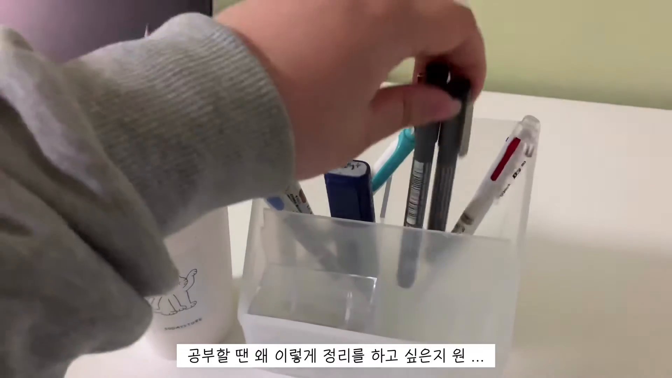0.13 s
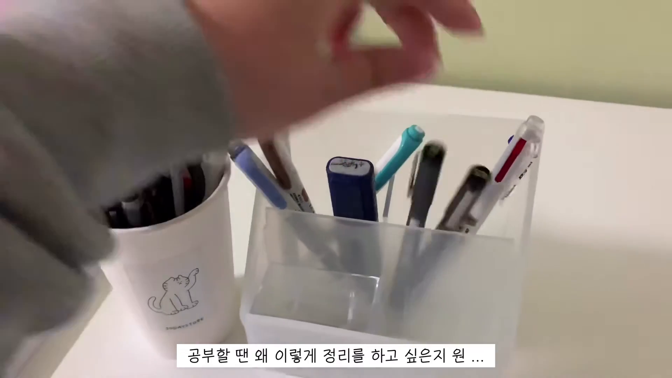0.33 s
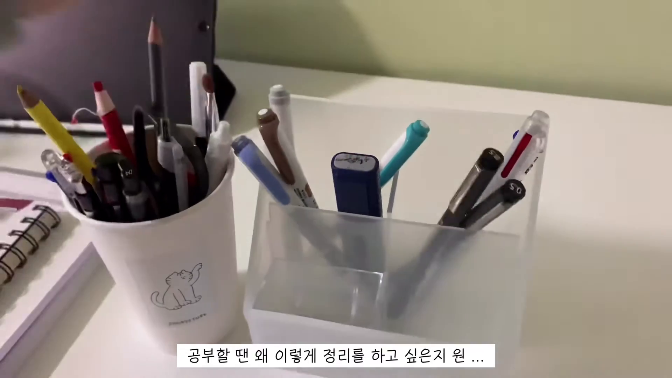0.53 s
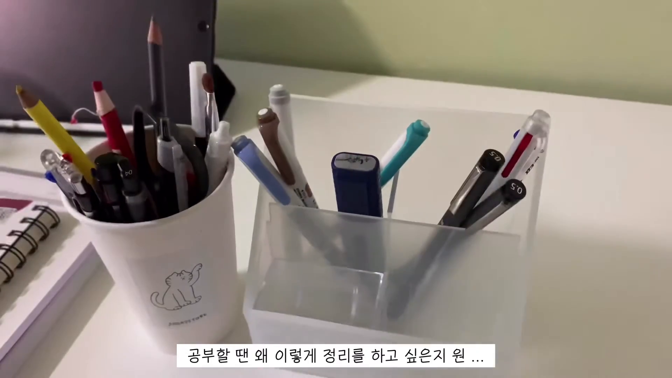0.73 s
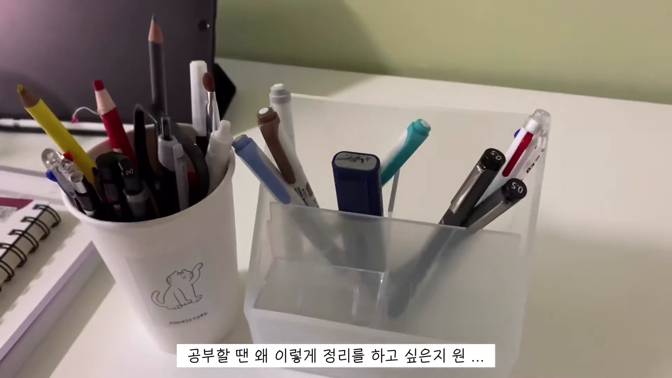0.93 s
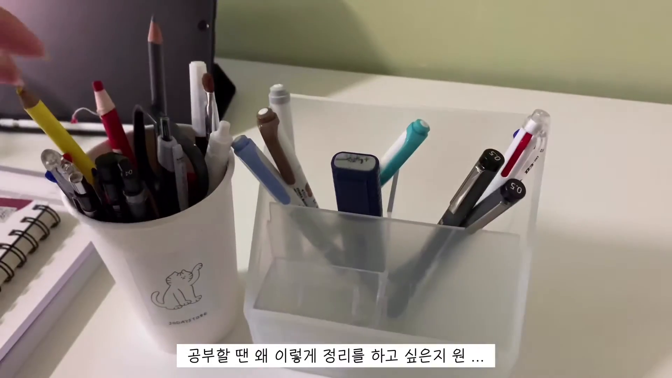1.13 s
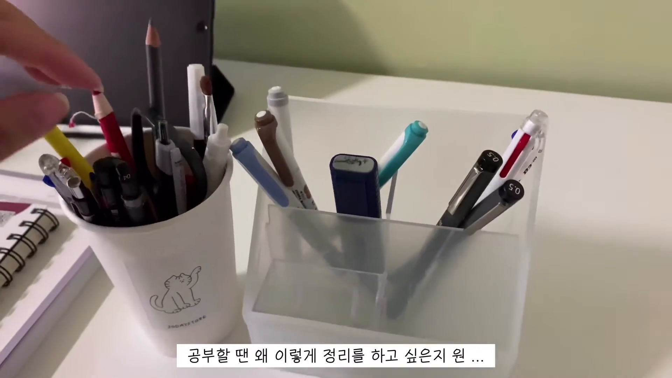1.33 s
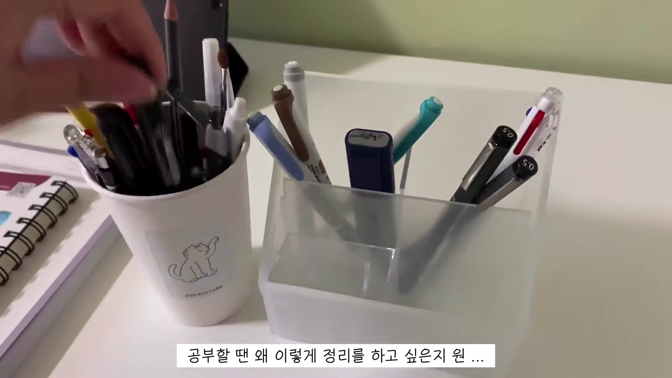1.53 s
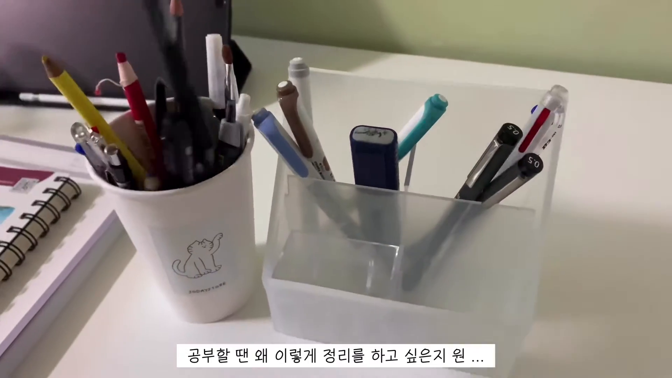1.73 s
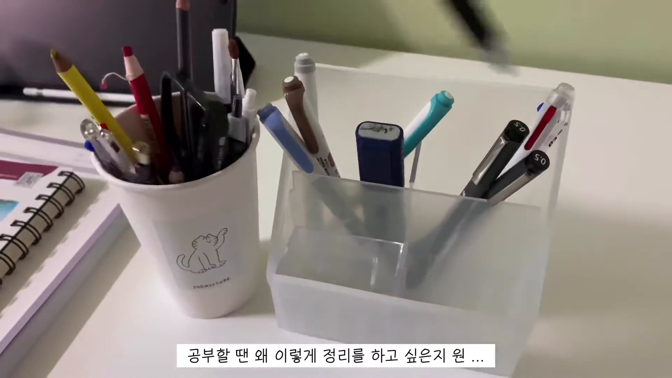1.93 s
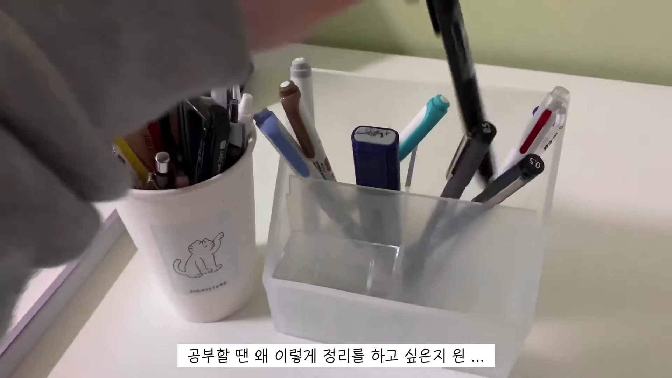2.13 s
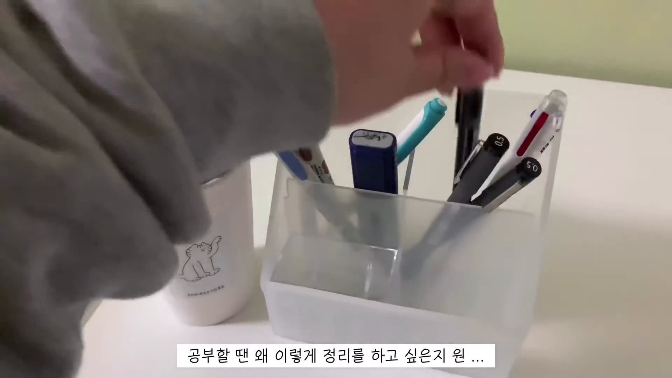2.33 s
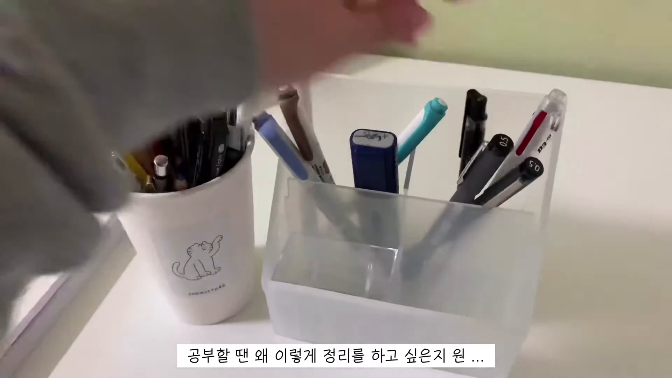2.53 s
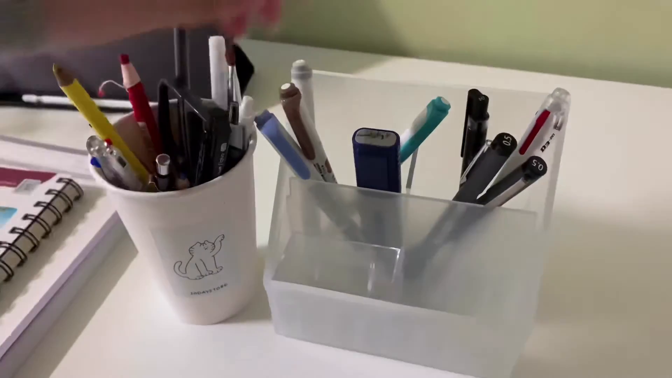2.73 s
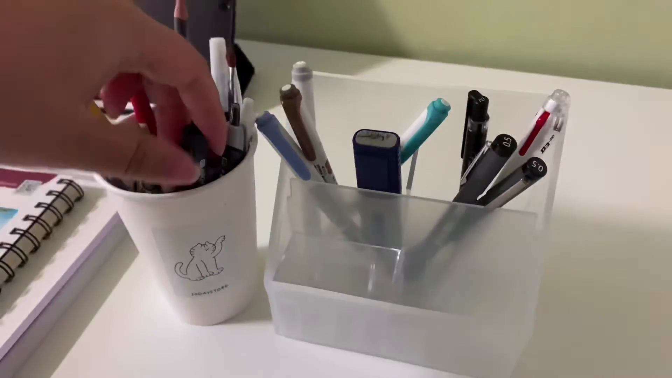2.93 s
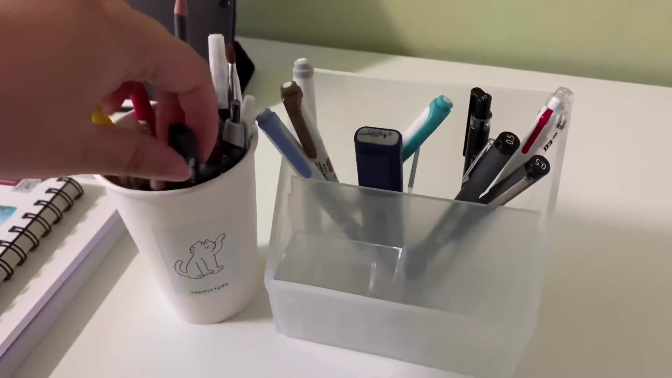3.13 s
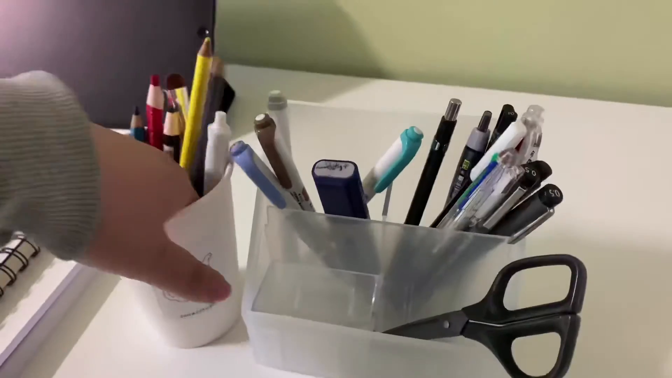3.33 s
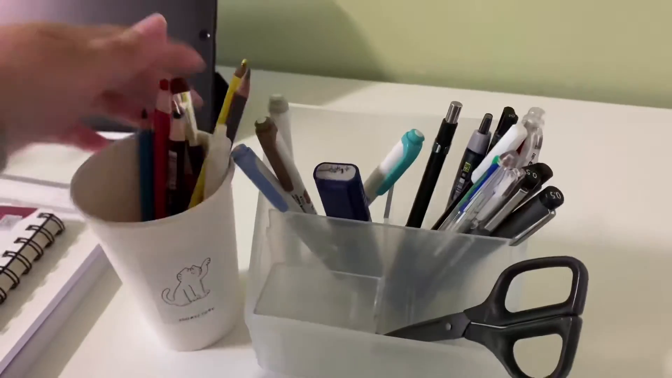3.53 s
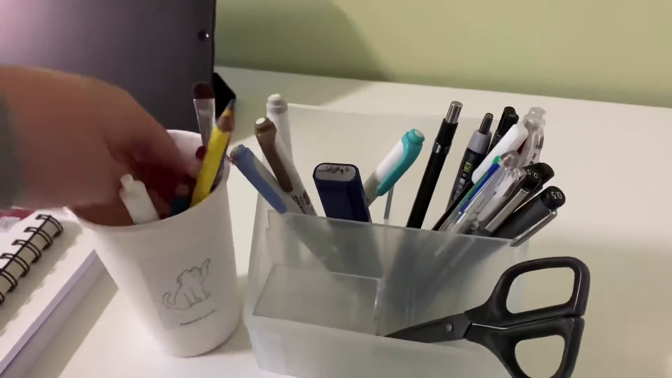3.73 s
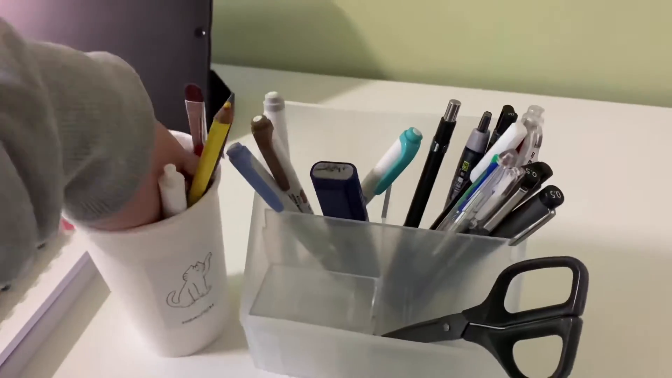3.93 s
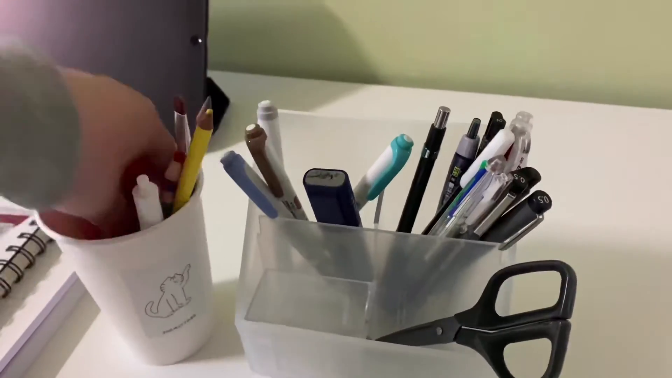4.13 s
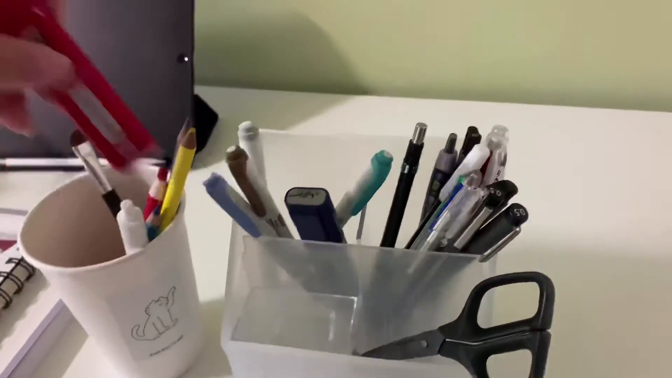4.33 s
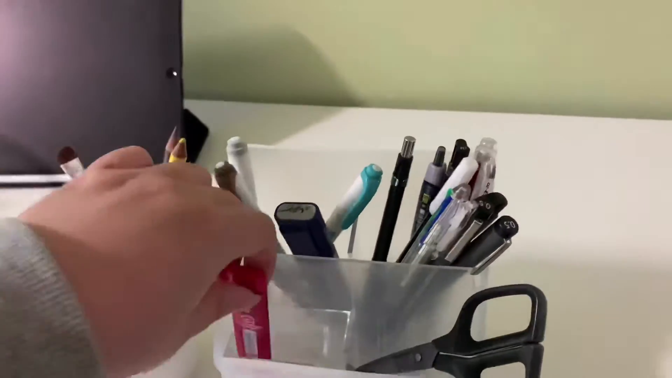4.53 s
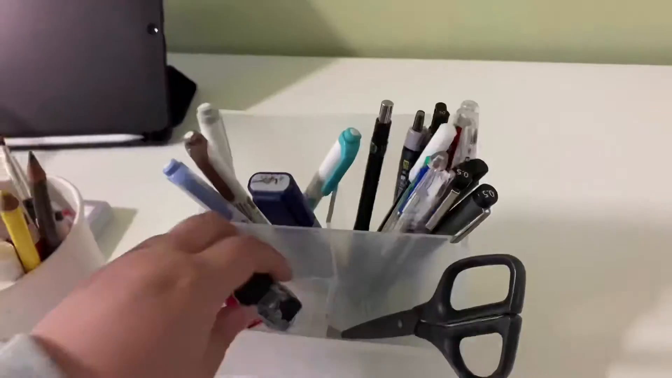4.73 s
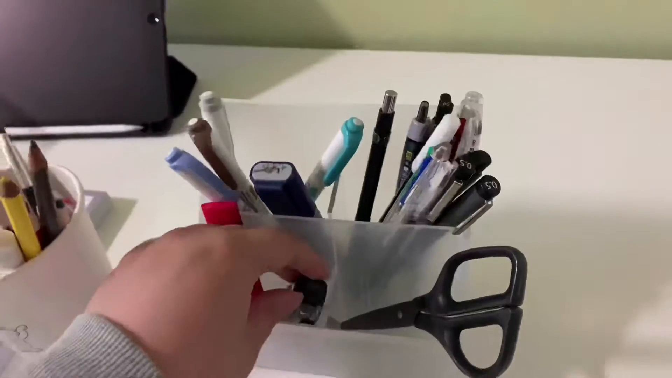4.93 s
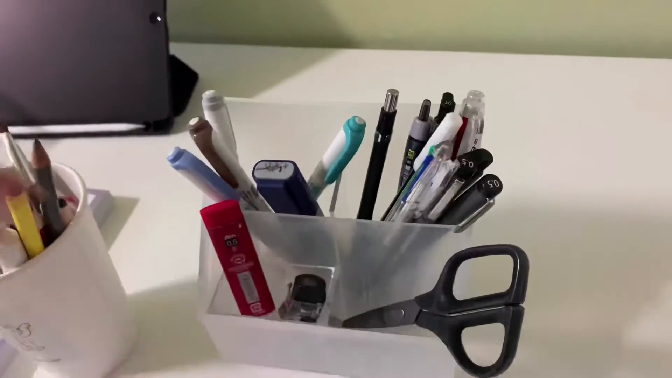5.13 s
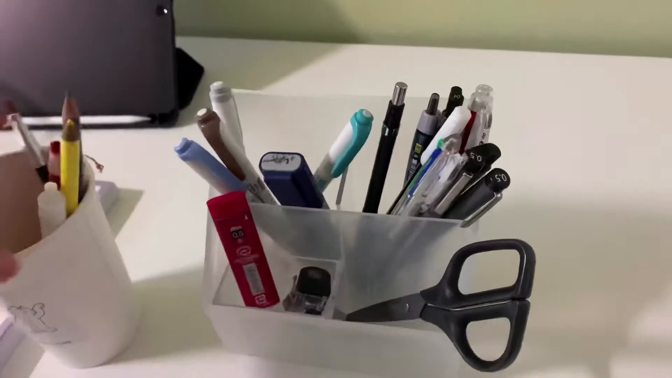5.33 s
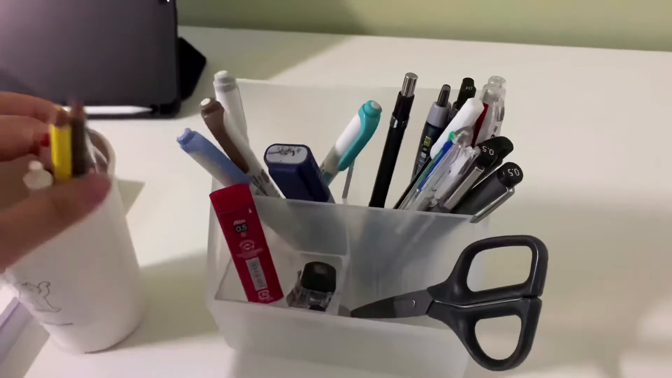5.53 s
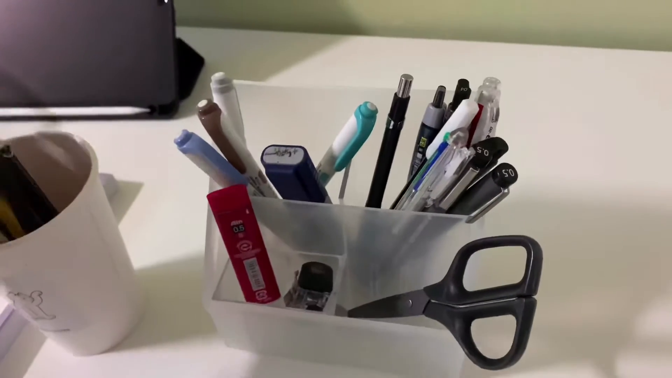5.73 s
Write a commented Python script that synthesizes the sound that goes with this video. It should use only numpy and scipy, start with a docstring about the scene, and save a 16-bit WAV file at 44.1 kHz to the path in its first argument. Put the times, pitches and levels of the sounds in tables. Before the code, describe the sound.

Close up in a small quiet room, two bursts of clatter sound as pens fall into a hollow plastic desk holder, with soft tapping and scraping between them. Lighter, busier sounds follow: pencils jostle in a paper cup and little items click into the now fuller holder. At the end the cup scrapes softly across the desk and the pencils rattle inside.

```python
"""Pens, paper cup and desk organizer.

Pens pulled from a paper cup drop into a nearly empty plastic organizer, which rings and thumps the desk.
Then fingers rummage among the pencils in the cup, small plastic items click into the filled organizer,
and the cup slides over the desk, pencils rattling. Close stereo microphone, small quiet room."""
import sys
import numpy as np
from scipy import signal
from scipy.fft import rfft, irfft, next_fast_len
from scipy.io import wavfile
from scipy.ndimage import uniform_filter1d

SR = 44100
rng = np.random.default_rng(int(sys.argv[2]) if len(sys.argv) > 2 else 0)


def transcribe(u):
    """Save the signal u as a 16-bit wav file named by the first command-line argument.

    u: samples, shape (n,) or (channels, n), limited to [-1, 1]; the rate is SR.
    q: integer samples, one column per channel.
    """
    v = np.clip(np.atleast_2d(u).T, -1, 1)
    q = np.round(v * 32767).astype(np.int16)
    wavfile.write(sys.argv[1], SR, q)


N = 259308

# Struck parts. Each pair: ring pitch in Hz, ring level in dB re the crack.
PENCIL, BARREL, MARKER = (1380, 4), (1880, 0), (1665, 1)
CAP, LID, CLIP, NIB = (2480, 5), (3100, 6.5), (4700, 2), (8600, 6)
GRIPPED = (5600, -12.5)  # damped by the fingers
# Modes. Each row: frequency in Hz, relative level in dB, T60 in seconds.
HOLLOW_WALL_MODES = [(306.6, -10, 0.026), (388.2, -7.5, 0.34), (440, -3.5, 0.096), (516, 8, 0.065),
                     (632, -4.5, 0.097), (765.6, -9, .12), (880, -8, 0.014), (873, -4.5, 0.15),
                     (953, -0.5, .09), (1167, -10.5, 0.17), (1474, -11.5, 0.071), (1644, 1, 0.13),
                     (1855, -1.5, 0.13), (1995, -8, .08), (2227, -5, 0.022), (2370, -5, 0.15),
                     (3119, -12, 0.058), (5030, -8, 0.066)]  # nearly empty organizer
CUP_WALL_MODES = [(294.6, 7, 0.089), (379.7, -4.5, 0.092), (570, -13.5, 0.048), (749.6, 4.5, 0.028),
                  (862, 9.5, 0.012), (1012, 0, 0.045), (1272, 8.5, 0.036), (1464.4, 9, 0.057),
                  (1658, -7, 0.048), (2091, -0.5, 0.055), (2300, -24, 0.058), (2650, -6, 0.02),
                  (2980, -26, 0.054)]  # cup beside the filled organizer
DESK_HEAVY_MODES = [(57.55, -13, 0.35), (100, -2.5, 0.14), (124.3, -1, 0.13), (150.7, 0.5, 0.13),
                    (183, -5, 0.073)]  # under pens
DESK_LIGHT_MODES = [(136, -31, 0.18), (148.7, -1.5, 0.094), (166.8, -4.5, 0.075), (227, -5.5, 0.049)]  # under light items


def amp(db):
    """Decibels to gain."""
    return 10 ** (np.asarray(db) / 20)


def unit(x):
    """Scale to unit RMS."""
    return x / np.sqrt(np.mean(x ** 2) + 1e-30)


def interp_log(points, hz):
    """Interpolate (Hz, value) points over log frequency."""
    points_hz, values = np.transpose(points)
    return np.interp(np.log(hz + 1), np.log(points_hz + 1), values)


def colour(x, points):
    """Filter by (Hz, dB) points."""
    n = x.shape[-1]
    size = next_fast_len(n + 2048)
    gain = amp(interp_log(points, np.fft.rfftfreq(size, 1 / SR)))
    return irfft(rfft(x, size) * gain, size)[..., :n]


def low_cut(x, hz):
    """Third-order high-pass."""
    return signal.sosfilt(signal.butter(3, hz, "high", fs=SR, output="sos"), x)


def add(mix, start_s, sound):
    """Mix a stereo sound in place."""
    part = mix[:, max(round(start_s * SR), 0):][:, :sound.shape[1]]
    part += sound[:, :part.shape[1]]


def stereo(pair):
    """Mid and side to left and right: bass shared, treble wide."""
    # Each row: frequency in Hz, side gain in dB.
    width = [(60, -16.5), (140, -18.5), (260, -15), (1000, -2), (2000, -3.5), (4000, 0.5), (8000, 1.5),
             (13000, -1)]
    # Each row: frequency in Hz, left re right in dB.
    balance = [(150, -0.5), (270, -2), (420, 2.5), (700, -0.5), (1050, 4), (1500, -1), (2000, 2), (3000, 0),
               (12000, -1.5)]
    side = colour(pair[1], width)
    half = np.array(balance) * [1, .5]
    return np.array([colour(pair[0] + side, half), colour(pair[0] - side, half * [1, -1])])


def ring(modes, t, scatter_db, rise_s):
    """Damped modes; each contact point weights them differently."""
    hz, db, t60_s = np.transpose(modes)[:, :, None]
    gain = amp(db + scatter_db * rng.standard_normal(db.shape))
    decay = np.exp(-np.log(1000) * t / t60_s)
    tones = np.sin(2 * np.pi * (hz * t + rng.random(db.shape)))
    return (gain * decay * tones).sum(0) * (1 - np.exp(-t / rise_s))


def quiet_room():
    """Faint hum and moving air, each steady for a stretch."""
    # Each row: start in seconds, hum level in dB, air level in dB.
    stretches = [(0, -116, -104), (.1, -70, -93), (3.22, -88, -70.5), (5.16, -100, -64.5)]
    # Each row: frequency in Hz, relative density in dB.
    hum_spectrum = [(20, -18), (45, -6.5), (60, -1), (85, -10.5), (118, -1), (160, -16), (300, -24.5),
                    (900, -32), (2000, -37.5), (16000, -44)]
    air_spectrum = [(20, -37.5), (90, -20), (160, -2), (230, -11), (305, 6.5), (420, -9.5), (700, -20.5),
                    (3000, -30), (12000, -32.5), (16000, -40)]
    start_s, hum_db, air_db = np.transpose(stretches)
    stretch = np.searchsorted(start_s[1:], np.arange(N) / SR)
    out = np.zeros((2, N))
    for db, spectrum in [(hum_db, hum_spectrum), (air_db, air_spectrum)]:
        gain = amp(uniform_filter1d(db[stretch], round(.025 * SR)))
        out += gain * unit(stereo(colour(rng.standard_normal((2, N)), spectrum)))
    return out


def room_tail(t):
    """Diffuse reflections, each band decaying at its own rate."""
    # Each row: frequency in Hz, T60 in seconds.
    decay_times = [(100, 0.46), (300, 0.24), (900, 0.19), (2500, 0.18), (7000, 0.1), (15000, 0.14)]
    # Each row: frequency in Hz, gain in dB.
    tail_spectrum = [(150, -3), (500, 4), (1200, 2), (3000, 1), (6000, 0), (13000, -6)]
    hz, frame_s, noise = signal.stft(rng.standard_normal((2, len(t))), SR, nperseg=256)
    decay = amp(-60 * frame_s / interp_log(decay_times, hz)[:, None])
    tail = signal.istft(noise * decay, SR, nperseg=256)[1][:, :len(t)]
    return colour(tail * (1 - np.exp(-t / .005)) / np.linalg.norm(tail[0]), tail_spectrum)


def slips(per_s, size_db, decay_s):
    """Stick-slip envelope: short pushes, random in size and time."""
    sizes = amp(size_db * np.minimum(rng.exponential(1, N), 3)) * (rng.random(N) < per_s / SR)
    return unit(signal.lfilter([1], [1, -np.exp(-1 / (decay_s * SR))], sizes))


def jostle(per_s=250, low_hz=750, high_hz=8000, tilt_db_per_oct=-1, count=24):
    """Pencils tap each other, each at its own dull pitch."""
    t, out = np.arange(1024) / SR, np.zeros((2, N))
    sizes = np.minimum(rng.exponential(1, N), 3) * (rng.random(N) < per_s / SR)
    pencil = rng.integers(0, count, N)
    hz = np.geomspace(low_hz, high_hz, count)[:, None, None]
    cycles = hz * t
    taps = np.sin(2 * np.pi * (cycles + rng.random((count, 2, 1)))) * cycles * np.exp(-cycles)
    taps *= amp(tilt_db_per_oct * np.log2(hz / low_hz))
    for at in np.flatnonzero(sizes):
        add(out, at / SR, sizes[at] * taps[pencil[at]])
    return unit(out)


def hand_pressure(strokes, grip_s=.011, release_s=.04, lurch_db=1, lurch_s=.02):
    """Uneven rubbing force and desk shake: each stroke grips, swells or sags, lets go."""
    now, force, shake = np.arange(N) / SR, np.zeros(N), np.zeros(N)
    for start_s, length_s, db, swell_db, rumble_db in strokes:
        t = now - start_s
        along = np.clip(t / length_s, 0, 1) - .5
        touching = np.clip(np.minimum(t / grip_s, 1 + (length_s - t) / release_s), 0, 1) ** 2
        push = touching * amp(db + swell_db * along)
        force = np.maximum(force, push)
        shake = np.maximum(shake, push * amp(rumble_db))
    lurch = unit(uniform_filter1d(rng.standard_normal(N), round(lurch_s * SR)))
    return force * amp(lurch_db * lurch), shake


def rubbing(strokes, wall_modes, desk_modes, spectrum, grains_per_s, catches_per_s,
            hiss_db, wall_db, taps_db, room_db, gain_db, rumble_db, cut_hz):
    """Friction: grains hiss, pencils jostle, rarer catches ring the walls, the hand shakes the desk."""
    t = np.arange(16384) / SR
    force, shake = hand_pressure(strokes)
    grains = rng.standard_normal((2, N)) * (slips(grains_per_s, size_db=3, decay_s=.00091) + amp(hiss_db))
    taps = jostle()
    catches = force * rng.standard_normal((2, N)) * slips(catches_per_s, size_db=6, decay_s=.0009)
    wall = np.array([ring(wall_modes, t, scatter_db=1, rise_s=.002) for _ in range(2)])
    hollow = signal.oaconvolve(catches, wall / np.linalg.norm(wall[0]), axes=1)[:, :N]
    scrape = force * (unit(colour(grains, spectrum)) + amp(taps_db) * taps)
    rub = amp(gain_db) * stereo(scrape + amp(wall_db) * hollow)
    rub += amp(room_db) * signal.oaconvolve(rub, room_tail(t), axes=1)[:, :N]
    desk = ring(desk_modes, t, scatter_db=1, rise_s=.0053)
    rumble = signal.oaconvolve(grains, desk[None], axes=1)[:, :N]
    return low_cut(rub + amp(rumble_db) * shake * unit(stereo(rumble)), cut_hz)


def cup_rubs():
    """Fingers rummage in the cup; the cup slides over the desk."""
    # Each row: start in seconds, length in seconds, relative level in dB, swell in dB, rumble offset in dB.
    strokes = [(3.218, 0.12, -51.5, -26.5, -8.5), (3.313, 0.061, -45, -17.5, -10),
               (3.528, 0.087, -42, -1, -6.5), (3.59, 0.057, -34.5, 0.5, -0.5), (3.69, 0.057, -46.5, 0, -13),
               (3.745, 0.058, -42, -10, -11), (3.82, .13, -54, 1, -12), (3.95, .16, -51.5, -4.5, -11.5),
               (4.115, 0.09, -51, -5, -13), (4.37, 0.042, -47, -21, -6.5), (4.595, 0.057, -45.5, 13, -27),
               (4.84, 0.063, -62.5, -20, -8), (4.95, .04, -67, -16, -14), (5.235, 0.035, -42, -15, 3),
               (5.279, 0.032, -36.5, -24.5, 1.5), (5.382, 0.17, -49.5, -2, -2.5),
               (5.548, 0.088, -51.5, 4, 4.5), (5.652, .06, -45, -22, -6.5), (5.725, 0.095, -46.5, 20, -17),
               (5.851, .03, -28.5, -3, -4)]
    # Each row: frequency in Hz, relative density in dB.
    spectrum = [(120, -12.5), (370, 0), (560, -15.5), (850, -11), (1450, -7), (1800, -17.5), (2550, -5.5),
                (3200, -14), (5900, -13.5), (7600, -24.5), (10000, -13), (13300, -24), (16000, -20)]
    return rubbing(strokes, CUP_WALL_MODES, DESK_LIGHT_MODES, spectrum,
                   grains_per_s=390, catches_per_s=90, hiss_db=-1, wall_db=-1.5, taps_db=-9,
                   room_db=-28.5, gain_db=-4, rumble_db=-2, cut_hz=135)


def slides_and_swells():
    """Pens slide and scrape; brief swells of noise lead into three loud clacks."""
    # Each row: start in seconds, length in seconds, relative level in dB, swell in dB, rumble offset in dB.
    strokes = [(.2, .025, -56.5, 6, 11), (.228, .014, -34.5, 13.5, 0), (1.45, 0.096, -46.5, -4, 10),
               (1.56, 0.13, -56.5, -3, 11), (1.67, 0.13, -64, -8, 12), (1.775, 0.13, -62.5, -3.5, 14),
               (1.905, 0.09, -47, 0, -1.5), (2.14, 0.096, -54, -22.5, -6), (2.26, 0.063, -68.5, 2, 20.5),
               (2.315, 0.012, -55.5, 15, 3), (2.36, 0.028, -41, 8, -1.5), (2.79, 0.12, -56, 2, 6.5),
               (3.03, .12, -66.5, -10.5, 11), (3.16, 0.062, -55.5, -14, -6)]
    # Each row: frequency in Hz, relative density in dB.
    spectrum = [(120, -4), (300, 13), (600, 7), (1000, -1), (1500, -4), (2300, 0), (3000, -10.5), (4000, 4),
                (5500, -11), (8000, -15), (10500, -29), (12500, -37), (16000, -42)]
    return rubbing(strokes, HOLLOW_WALL_MODES, DESK_HEAVY_MODES, spectrum,
                   grains_per_s=820, catches_per_s=150, hiss_db=-4, wall_db=-11.5, taps_db=-6,
                   room_db=-6.5, gain_db=-3.5, rumble_db=-4, cut_hz=38)


def crack(t, rise_s, snap_s, chatter_s, chatter_db, spread_s):
    """Hard snap and brief chatter; bending waves carry the treble out first."""
    decay = np.exp(-t / snap_s) + amp(chatter_db) * np.exp(-t / chatter_s)
    burst = rng.standard_normal((2, len(t))) * decay * (1 - np.exp(-(t / rise_s) ** 2))
    hz = np.fft.rfftfreq(len(t), 1 / SR)
    delay_s = spread_s * np.sqrt(1000 / (hz + 200))
    dispersion = np.exp(-2j * np.pi * np.cumsum(delay_s) * hz[1])
    return irfft(rfft(burst) * dispersion, len(t))


def barrel_ring(hz, t60_s, t):
    """Barrel, cap or clip: a cluster of close, short modes."""
    # Each row: frequency ratio, level in dB.
    cluster = [(.62, -7), (.74, -7), (.85, -4), (.94, -1), (1, 0), (1.07, -2), (1.2, -6), (1.38, -10)]
    detune = 1 + .02 * rng.standard_normal(len(cluster))
    modes = [(hz * ratio * d, db, t60_s) for (ratio, db), d in zip(cluster, detune)]
    return ring(modes, t, scatter_db=1, rise_s=.00056)


def balance_attack(sound, levels_db, attack_s=.012):
    """Equalize a blow toward the given knock, clack and tick levels in its attack."""
    # Wall knock, clack, tip tick. Each row: low edge in Hz, high edge in Hz.
    bands = [(250, 1100), (1100, 3500), (3500, 16000)]
    n = round(attack_s * SR)
    power = (abs(rfft(sound[:, :n])) ** 2).mean(0) * 2 / n ** 2
    hz = np.fft.rfftfreq(n, 1 / SR)
    band_power = [power[(hz > low) & (hz < high)].sum() for low, high in bands]
    knock_db, clack_db, tick_db = levels_db - 10 * np.log10(band_power)
    return colour(sound, [(800, knock_db), (1450, clack_db), (2900, clack_db), (4200, tick_db)])


def blows(hits, wall_modes, desk_modes, spectrum, crack_shape, sharpen, knock_db, tick_db,
          wall_db, barrel_t60_s, room_db, thud_db, boom_db, thud_cut_hz, gain_db):
    """Each blow cracks, rings barrel and walls, shakes the desk and echoes in the room."""
    out, t = np.zeros((2, N)), np.arange(16384) / SR
    lead_samples, medium_blow_db = 44, -36
    fade = np.clip((t[-1] - t - .03) / .1, 0, 1)
    tails = [room_tail(t) for _ in range(6)]
    for k, (start_s, db, hardness_db, desk_db, (barrel_hz, barrel_db)) in enumerate(hits):
        tail = tails[k % len(tails)]
        edge = [(5000, 0), (13000, sharpen * (db - medium_blow_db))]  # stronger is brighter
        contact = unit(colour(colour(crack(t, **crack_shape), spectrum), edge))
        barrel = np.array([barrel_ring(barrel_hz, barrel_t60_s, t) for _ in range(2)])
        wall = np.array([ring(wall_modes, t, scatter_db=2.5, rise_s=.0005) for _ in range(2)])
        clack = contact + amp(barrel_db) * unit(barrel)
        echo = np.std(clack) * signal.fftconvolve(contact, tail, axes=1)[:, :len(t)]
        hit = fade * (clack + amp(wall_db) * unit(wall) + amp(room_db) * echo)
        hit = stereo(np.pad(hit, ((0, 0), (lead_samples, 0))))
        # Harder contact is briefer: less knock, more tick.
        levels_db = [db + knock_db - .67 * hardness_db, db, db + tick_db + hardness_db]
        add(out, start_s - lead_samples / SR, amp(gain_db) * balance_attack(hit, levels_db))

        desk = low_cut(ring(desk_modes, t, scatter_db=.42, rise_s=.0027), thud_cut_hz)
        boom = signal.fftconvolve(desk[None], tail, axes=1)[:, :len(t)]
        thud = stereo(fade * (desk * [[1], [0]] + amp(boom_db) * boom))  # direct thud in mid only
        thud /= np.std(thud[:, :1300])
        add(out, start_s, amp(db + desk_db + thud_db) * thud)
    return out


def light_clicks():
    """Light items and pencils strike the cup and the filled, damped organizer."""
    # Each row: start in seconds, relative level in dB, hardness in dB, thud offset in dB, struck part.
    hits = [(3.2238, -51, -28, -21, PENCIL), (3.2602, -43, 7, -18, PENCIL), (3.278, -67, 25, -8, NIB),
            (3.3151, -39, 8.5, -8, GRIPPED), (3.3406, -47, -13, -22, CAP), (3.3725, -53.5, 0, -28, PENCIL),
            (3.5321, -46, -11.5, -18, PENCIL), (3.553, -45.5, -7, -19, GRIPPED), (3.578, -41, -3, -29, CAP),
            (3.6174, -33, -2, -9, BARREL), (3.639, -35.5, -1, -5, BARREL),
            (3.6893, -37.5, 3.5, -32, BARREL), (3.7172, -41.5, 0, -27, GRIPPED),
            (3.7461, -44, -10, 6, PENCIL), (3.797, -51, -5, -9, PENCIL), (3.814, -49, 8, -30, PENCIL),
            (4.015, -52.5, 8, -31, GRIPPED), (4.0689, -46.5, 0, -28, PENCIL),
            (4.1138, -44.5, 2, -18, MARKER), (4.1682, -48, -12, -7, GRIPPED),
            (4.2126, -49, -7.5, -4.5, PENCIL), (4.3075, -75, 17.5, -12, GRIPPED),
            (4.3712, -42.5, -12, -19, PENCIL), (4.4575, -64, 11.5, -2, LID),
            (4.5229, -47, 22.5, -11.5, CLIP), (4.5593, -33, 5, -29, LID), (4.5912, -33, 3, -32, CAP),
            (4.6316, -47.5, 17, -23, CAP), (4.6476, -39, -12, -11, GRIPPED), (4.661, -44, -4, -17, CAP),
            (4.7174, -51, 4.5, -11, CAP), (4.7913, -42, 11, -44, GRIPPED),
            (4.892, -51.5, -19, -4.5, BARREL), (4.9095, -48.5, 5, -26.5, CAP),
            (4.9524, -43.5, 4, -31, GRIPPED), (4.9754, -51.5, -0.5, -16, CAP), (4.993, -55, 0, -26, BARREL),
            (5.0312, -54.5, -1.5, -19, CAP), (5.226, -35.5, -2, -25, BARREL),
            (5.2338, -26.5, 2.5, -11, CAP), (5.2785, -27.5, 1, -19.5, MARKER),
            (5.5475, -30.5, -1, -6, PENCIL), (5.5805, -37.5, -6, -17, PENCIL), (5.6034, -60, 29, -14, NIB),
            (5.6513, -37, 6.5, -13, BARREL), (5.664, -39.5, -3, -26, MARKER), (5.688, -55, 17, -21, NIB),
            (5.7251, -42.5, -0.5, -16, PENCIL), (5.74, -41, -2, -12, PENCIL),
            (5.778, -34.5, -6, -10, PENCIL), (5.8055, -33.5, 11.5, -14, GRIPPED),
            (5.8514, -28, 17.5, -3.5, CLIP)]
    # Each row: frequency in Hz, relative crack density in dB.
    spectrum = [(100, -60), (250, 3), (500, -4), (1100, -0.5), (2300, -1), (3500, -8.5), (5500, -11),
                (8000, -17), (10500, -15.5), (13000, -20.5), (16000, -27)]
    crack_shape = dict(rise_s=.0007, snap_s=.0013, chatter_s=.0099, chatter_db=-17.5, spread_s=.000801)
    clicks = blows(hits, CUP_WALL_MODES, DESK_LIGHT_MODES, spectrum, crack_shape,
                   sharpen=.05, knock_db=-3, tick_db=-8, wall_db=-4, barrel_t60_s=.029,
                   room_db=-17.5, thud_db=-5, boom_db=-11, thud_cut_hz=137, gain_db=-3)
    return low_cut(clicks, hz=90)


def pen_drops():
    """Pens strike the hollow organizer and each other."""
    # Each row: start in seconds, relative level in dB, hardness in dB, thud offset in dB, struck part.
    hits = [(.111, -52, -10, 8, PENCIL), (.191, -48.5, -8, -1.5, CAP), (.2455, -17, 0.5, -15.5, BARREL),
            (.265, -26, -2, -9.5, BARREL), (.2873, -16.5, 1, -7.5, MARKER),
            (.3055, -33, -3.5, -13.5, BARREL), (.3325, -33.5, 1.5, -12, BARREL),
            (.351, -37.5, 1, -27.5, GRIPPED), (.3572, -24.5, -2, -17.5, MARKER), (.453, -41.5, 2, -28, CAP),
            (.459, -40.5, 1, -0.5, BARREL), (.473, -40.5, -7, -18, PENCIL), (1.134, -67.5, 12.5, 1, CLIP),
            (1.226, -60.5, 3, -18, CAP), (1.451, -59, -5.5, 22.5, BARREL), (1.469, -49.5, 13.5, -5, CLIP),
            (1.478, -38, -1.5, -16, PENCIL), (1.505, -43, 9, 4, BARREL), (1.513, -37.5, 8.5, -30, CAP),
            (1.524, -48, -14.5, 10.5, PENCIL), (1.596, -45, 3.5, -13, CAP),
            (1.6203, -42, -5, -3.5, GRIPPED), (1.728, -58.5, 3, 4, PENCIL), (1.823, -61.5, 14, -21, LID),
            (1.914, -56, -16.5, -6, BARREL), (1.9296, -53, 4.5, -5.5, PENCIL),
            (1.9922, -22, 2, -8.5, BARREL), (2.0503, -42.5, -2.5, -21, LID), (2.0853, -49, -8, -14, BARREL),
            (2.1167, -41.5, -0.5, -31.5, GRIPPED), (2.1376, -40.5, -7.5, 7.5, BARREL),
            (2.191, -50, -5.5, 0, CAP), (2.2763, -66, -18.5, 2.5, CAP), (2.3322, -26.5, 1, -3, CAP),
            (2.3881, -18, 0.5, -9.5, CAP), (2.396, -32.5, 8.5, 5, GRIPPED), (2.5058, -57, -9.5, -2, PENCIL),
            (2.7897, -52.5, 7.5, -6.5, CAP), (2.856, -54, 5.5, 4.5, GRIPPED), (3.1675, -66.5, 0, 1, LID)]
    # Each row: frequency in Hz, relative crack density in dB.
    spectrum = [(100, -22), (250, -1), (500, 3), (780, -6.5), (1100, 3.5), (1450, -2.5), (2100, 3.5),
                (3300, -6.5), (5400, -4.5), (8000, -15.5), (10500, -19.5), (13000, -35.5), (16000, -32)]
    crack_shape = dict(rise_s=.00079, snap_s=.0041, chatter_s=.0063, chatter_db=-18.5, spread_s=.001)
    return blows(hits, HOLLOW_WALL_MODES, DESK_HEAVY_MODES, spectrum, crack_shape,
                 sharpen=.22, knock_db=2.5, tick_db=-8, wall_db=-5.5, barrel_t60_s=.026,
                 room_db=-11.5, thud_db=-2, boom_db=-6.5, thud_cut_hz=20, gain_db=1.5)


def scene():
    """Heavy pens, then lighter items, over the quiet room."""
    return pen_drops() + light_clicks() + slides_and_swells() + cup_rubs() + quiet_room()


def record(dry):
    """Soft clip, then low-pass."""
    rounded = dry / (1 + dry ** 8) ** (1 / 8)
    low_pass = signal.firwin(511, cutoff=16200, window=("kaiser", 9), fs=SR)
    return signal.oaconvolve(rounded, low_pass[None], "same")


dry = scene()
out = record(dry)
transcribe(out)
```